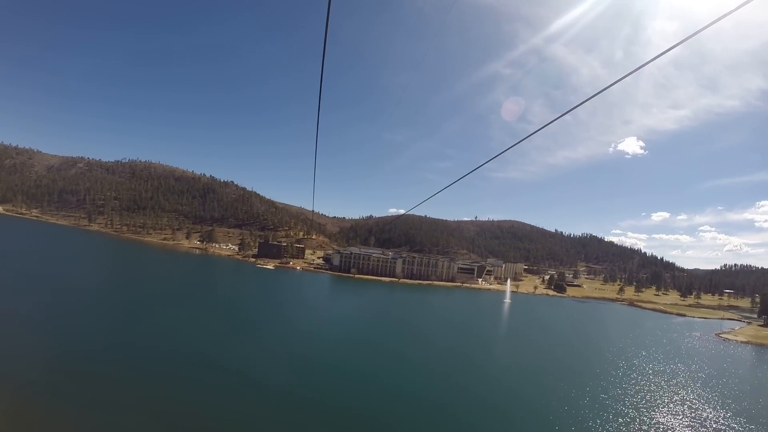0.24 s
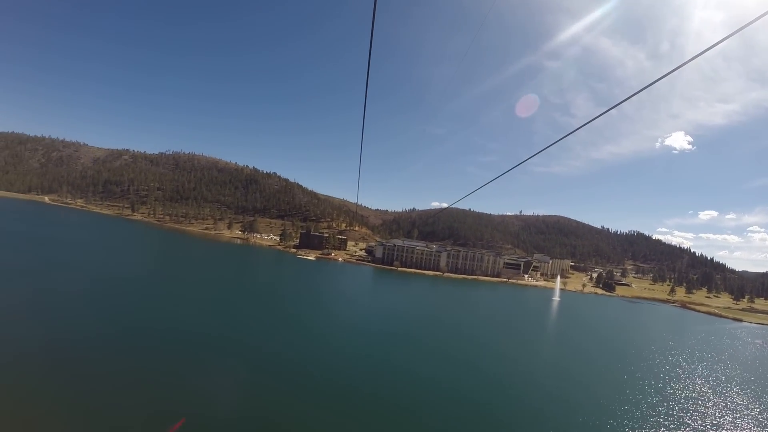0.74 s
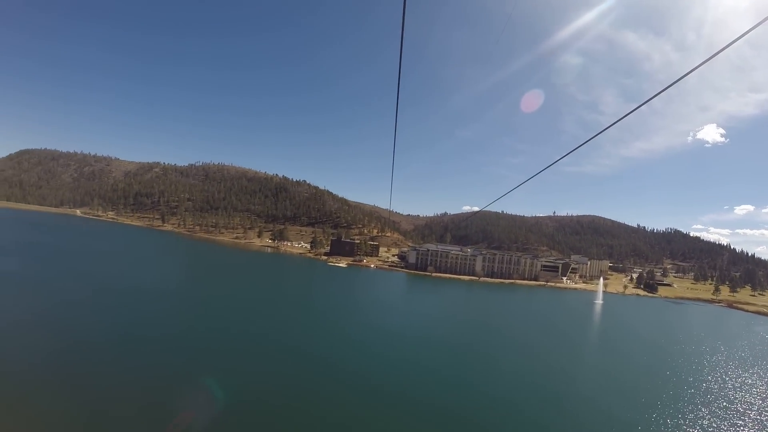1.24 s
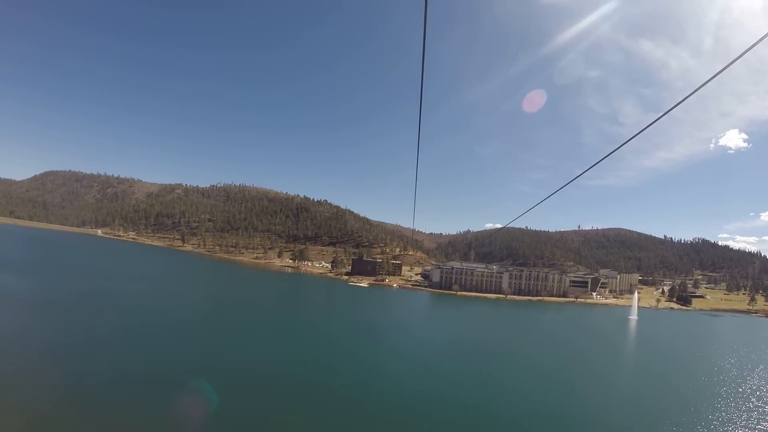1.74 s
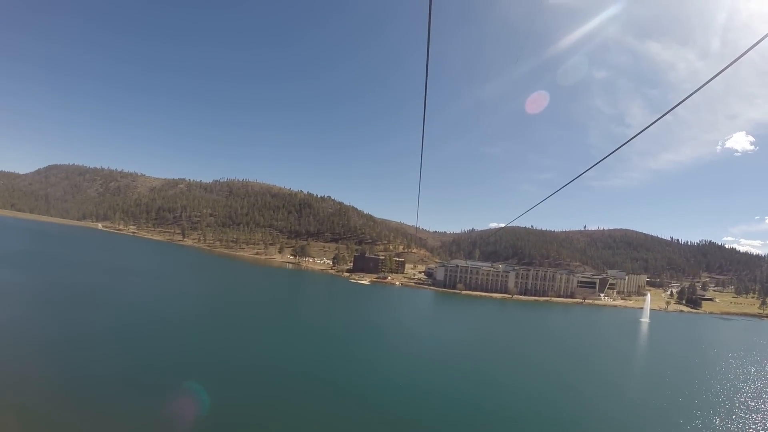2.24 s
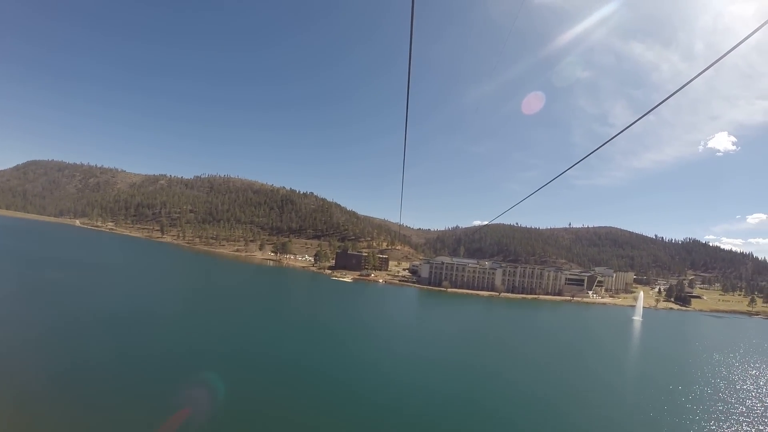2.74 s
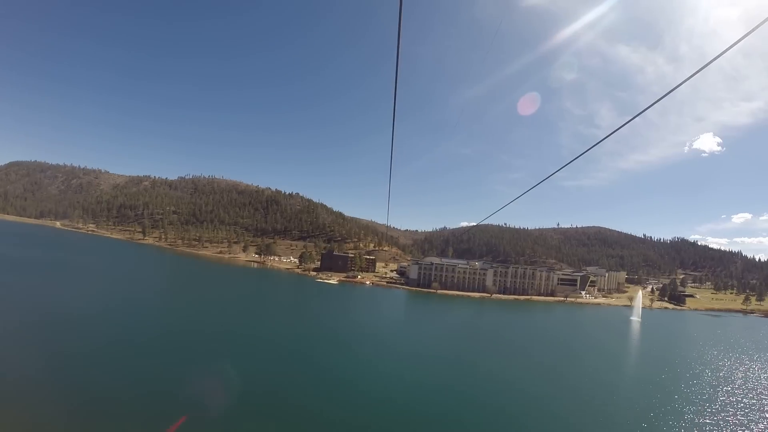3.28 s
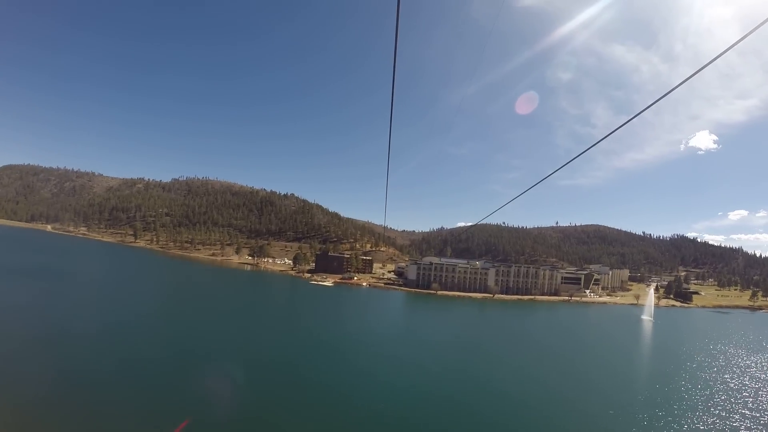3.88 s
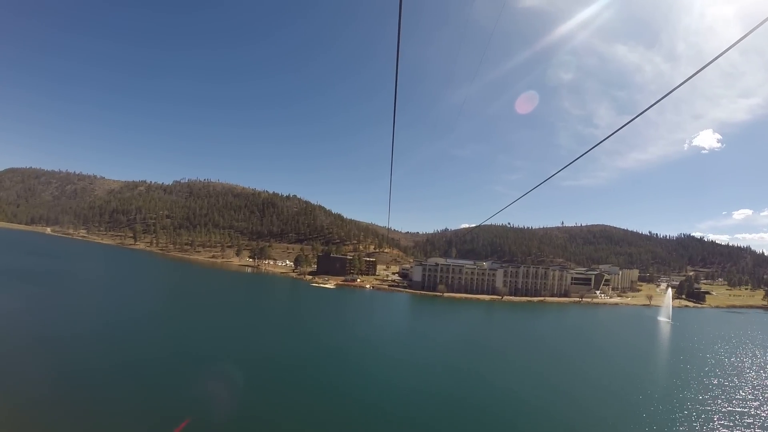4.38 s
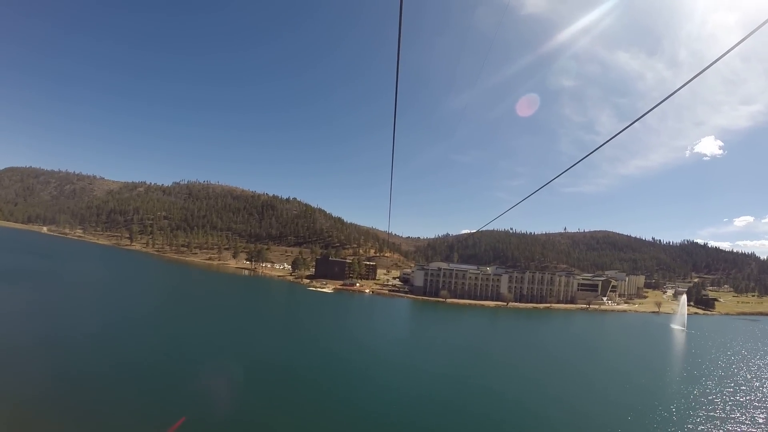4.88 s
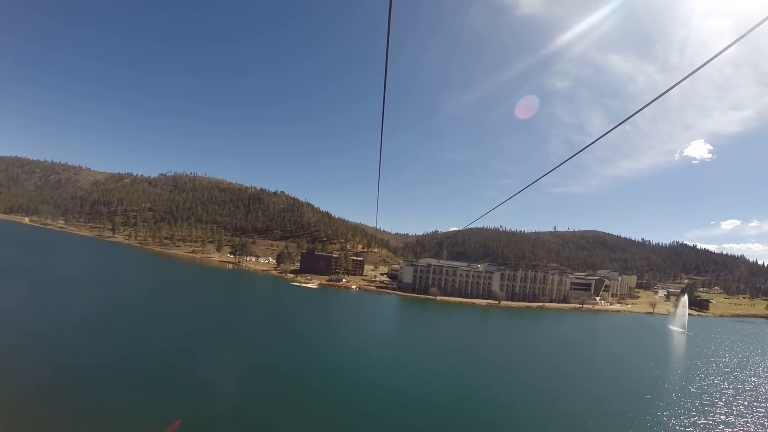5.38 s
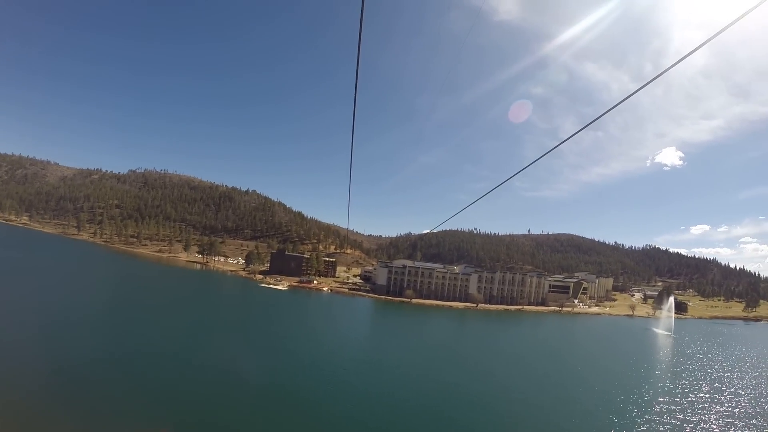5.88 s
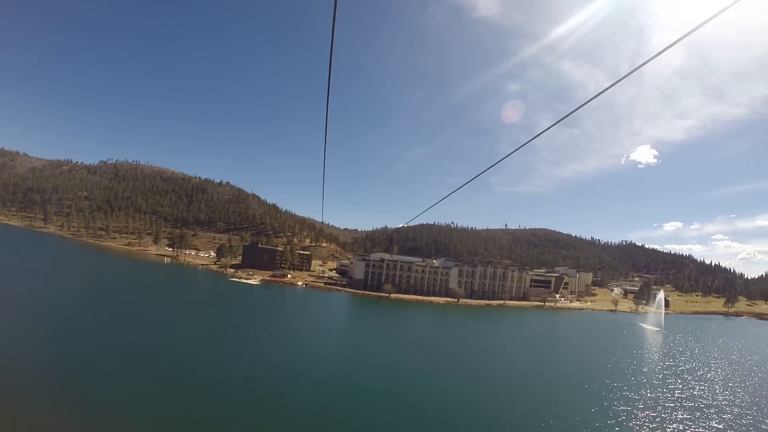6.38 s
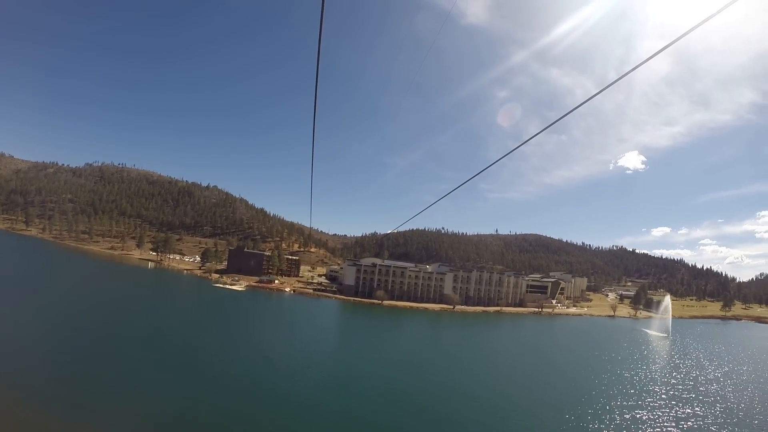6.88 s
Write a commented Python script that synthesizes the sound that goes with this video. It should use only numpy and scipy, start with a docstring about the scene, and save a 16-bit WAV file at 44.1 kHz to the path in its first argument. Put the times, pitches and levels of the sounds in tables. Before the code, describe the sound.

From 0 seconds the ride is in full motion: two trolley wheels roll fast on a steel cable, heard close through a resonant closed housing. A rough, bright steel roar dominates, strongest around the upper mids, with muffled wind rumbling and fluttering below. Two high whines near 2200 hertz, slightly apart, beat and waver through it, with a gritty, fast buzz from the front wheel. A tiny jolt ticks at about 0.8, and the roar surges around 1. It eases near 2.8 and 3.5, flickering constantly. Very short upward chirps of the front whine come near 1.1, 1.6, 3.5, 4.9, 5.6 and 6.4 as the wheel slips. From about 5.8 the roar thickens, and the front whine peaks at 6.2. The buzz fades near 6.9 while both whines sag slightly in pitch; the sound ends still rolling at 7.1.

```python
"""Fast trolley ride on a steel cable

A two-wheel trolley rolls fast along a steel cable, heard by a camera in a closed housing on the rider.
Wind rumbles on the microphone and steel on steel roars through the resonant housing: both are shaped noise.
Each wheel whines 19 times a turn, the two slightly apart so that they beat: both whines are sine waves.
More sine waves at multiples of the turn rate make the front wheel buzz once a turn."""
import sys
import numpy as np
from scipy import signal
from scipy.fft import rfft, irfft, next_fast_len
from scipy.io import wavfile
from scipy.ndimage import uniform_filter1d

SR = 44100
rng = np.random.default_rng(int(sys.argv[2]) if len(sys.argv) > 2 else 0)


def master(y):
    """Save y as 16-bit WAV."""
    cut = np.clip(np.atleast_2d(y).T, -1, 1)
    pcm = np.round(cut * 32767)  # scale
    wavfile.write(sys.argv[1], SR, pcm.astype(np.int16))


N = 313989  # length in samples

BUMPS_PER_TURN = 19
# Loudness of the two whines, before their flutter.
# Each row: time in seconds, front whine in dB, rear whine in dB.
WHINE_LEVELS = [(0, -41, -40), (.2, -35.5, -36.5), (.55, -42, -45), (.75, -39, -40), (.95, -43, -47),
                (1.15, -34.5, -39), (1.4, -44, -34.5), (1.6, -35, -38), (1.85, -39, -36.5),
                (2.2, -35.5, -39), (2.8, -40.5, -41), (3.35, -34, -45), (3.6, -36.5, -46),
                (4.2, -34, -40.5), (4.8, -36.5, -34.5), (5.1, -36.5, -35.5), (5.55, -34.5, -39),
                (5.8, -35, -43), (6.02, -34.5, -44), (6.17, -29, -57), (6.35, -31, -48), (6.6, -33.5, -46),
                (6.85, -34, -42), (7.12, -37, -44)]
WHINE_FLUTTER_DB = 2


def undb(db):
    """Gain of a level in dB."""
    return 10 ** (np.asarray(db) / 20)


def curves(table):
    """Columns of a table, after the time column, as one value per sample."""
    times, *columns = np.transpose(table)
    now = np.arange(N) / SR
    return [np.interp(now, times, column) for column in columns]


def walk(rate):
    """Smoothly wandering random curve, spread near 1, with about rate new values a second."""
    hold = int(SR / rate)
    steps = np.repeat(rng.standard_normal(N // hold + 1), hold)
    smooth = uniform_filter1d(uniform_filter1d(steps, hold), hold)
    return 1.69 * smooth[:N]  # smoothing shrinks the spread; this restores it


def colour(throb, points, rings, band_hz):
    """Spectrum and frequency axis of throbbing noise in the given colour, with unit level inside band_hz."""
    size = next_fast_len(N + SR // 10)
    hz = np.arange(1, size // 2 + 2) * SR / size
    point_hz, point_db = np.array(points).T
    db = np.interp(np.log(hz), np.log(point_hz), point_db)
    for ring_hz, width_hz, ring_db in rings:
        db = db + ring_db / (1 + (2 * (hz - ring_hz) / width_hz) ** 2)
    noise = np.resize(throb, size) * rng.standard_normal(size)
    spec = rfft(noise) * undb(db)
    inside = (hz > band_hz[0]) & (hz < band_hz[1])
    return spec * size / np.sqrt(2 * np.sum(np.abs(spec[inside]) ** 2)), hz


def bands(spec, hz, centres, db_of):
    """Sum of overlapping noise bands, each following its own level curve db_of(centre)."""
    place = np.interp(np.log(hz), np.log(centres), np.arange(len(centres)))
    out = np.zeros(N)
    for k, centre in enumerate(centres):
        share = np.clip(1 - np.abs(place - k), 0, 1)  # neighbouring bands crossfade
        out += irfft(spec * share)[:N] * undb(db_of(centre))
    return out


def jolt_db():
    """One short jolt: a brief lift in dB for the noise below and above the main roar."""
    jolt_s, half_s, lift_db = .795, .014, 5
    return lift_db * np.exp(-((np.arange(N) / SR - jolt_s) / half_s) ** 2)


def wind():
    """Turbulence on the microphone port: a rumble with a weaker rush above."""
    # How the wind rises and falls, before each band's flicker and the jolt.
    # Each row: time in seconds, rumble in dB, low rush in dB, high rush in dB.
    # Both rushes count from the rumble's mean level.
    wind_levels = [(0, -37, 2.5, -1), (.4, -39.5, -2.5, -1.5), (.75, -36.5, .5, 1), (.95, -34, 0, 4),
                   (1.4, -36.5, 1.5, 3.5), (2, -34, 0, 1), (2.8, -35, 0, -3), (3.3, -40, -3, -3),
                   (4, -35.5, -2.5, -2.5), (4.4, -36.5, 0.5, -2), (4.9, -37, -5, -2), (5.5, -35.5, -2, -3),
                   (5.9, -36.5, 1.5, 0.5), (7.12, -36, 1, 0.5)]
    # Colour of the wind. Each row: frequency in Hz, relative level in dB.
    wind_colour = [(12, -52), (20, -28), (45, -7.5), (114, 0.5), (288, -4.5), (460, -12.5), (750, -12.5),
                   (1100, -20), (2400, -58)]
    rumble_db, low_db, high_db = curves(wind_levels)
    spec, hz = colour(1., wind_colour, [], band_hz=(40, 330))

    def db_of(centre):
        if centre < 150:
            level_db = rumble_db
        elif centre < 350:
            level_db = low_db + rumble_db.mean()
        else:
            level_db = high_db + rumble_db.mean() + jolt_db()
        return level_db + 1.34 * walk(3.95)
    return bands(spec, hz, 40 * 1.6 ** np.arange(8), db_of)


def roar(turns):
    """Rough steel contact, a little louder once a turn; each band drifts and flickers on its own."""
    # How the roar rises and falls, before the trim and the random drifts below.
    # Each row: time in seconds, level in dB, then low part, treble and top in dB against that level.
    roar_levels = [(0, -26.5, 0.5, -1.5, -2.5), (.5, -28.2, 1.5, 0, 3), (.8, -27.5, 2, -1.5, 2),
                   (1, -24, 1.5, -3, -2), (1.25, -26, 1, -2.5, -1), (1.6, -26, 0, -2.2, -2.5),
                   (1.85, -27.5, 0, 0, 2), (2.4, -29, 1.5, -.5, 0), (2.8, -30.5, -.3, 1.5, 0),
                   (3.15, -28, -1, -.5, 0), (3.45, -31, -2, 1, 2.5), (4.1, -27.5, -2, -0.5, -.4),
                   (4.6, -30, -2, 1, 1.5), (5.05, -27, -2.5, -.5, 0), (5.4, -28.5, 0.5, -1, -.3),
                   (5.8, -25.5, -1, -2, -2), (6.2, -24, -0.5, -2, -1.5), (7.12, -24.5, -1.5, -0.6, -0.5)]
    # Colour of the roar inside the housing. Each row: frequency in Hz, relative level in dB per Hz.
    housing_colour = [(700, -26.5), (1000, -15.5), (1450, -4.5), (1850, -10), (2500, -6), (3300, 1),
                      (3600, -5), (3900, -18), (6000, -18.5), (7400, -30.5), (8000, -41.5), (10000, -38),
                      (12300, -49.5), (15000, -52)]
    # Narrow resonances and dips on top of it. Each row: centre in Hz, width in Hz, height in dB.
    housing_rings = [(2205, 190, 1.5), (2640, 200, 1.5), (3080, 130, -4.5), (3438, 94, -5), (3765, 120, -3),
                     (4670, 84, -3.5), (6230, 490, -3.5), (6860, 320, 2.5), (8770, 570, 8.5),
                     (9500, 500, 1.5), (10000, 300, -4), (11400, 600, -2), (12500, 400, 0),
                     (13200, 500, -13)]
    # Two narrow bands that sink and return.
    # Each row: time in seconds, lower band in dB, upper band in dB.
    narrow_levels = [(0, -2, 3), (1, -1, 2), (1.8, 1.5, -4), (3, 2.5, -8), (4.6, 1.5, -5), (5.2, -2, 4.5),
                     (6, -2.5, 1), (7.12, -2, 3)]
    narrow_hz, narrow_width_hz = (4100, 5170), (950, 200)
    trim_db = -1.5

    main_db, low_db, treble_db, top_db = curves(roar_levels)
    narrow = curves(narrow_levels)
    throb = 1 + .07 * np.cos(2 * np.pi * turns)
    spec, hz = colour(throb, housing_colour, housing_rings, band_hz=(2400, 3800))
    # upper edge of each part in Hz, and its level against the main one
    parts = [(1950, low_db + jolt_db()), (3900, 0), (7800, treble_db), (SR, top_db + jolt_db())]
    shudder_db = .7 * walk(6)  # shared by all bands

    def db_of(centre):
        part_db = next(db for edge_hz, db in parts if centre < edge_hz)
        narrow_db = sum(db * np.exp(-(2 * (centre - at) / width) ** 2)
                        for db, at, width in zip(narrow, narrow_hz, narrow_width_hz))
        drift_db = .7 * walk(2.5)
        flicker_db = 1.08 * walk(14)
        return main_db + trim_db + part_db + shudder_db + narrow_db + drift_db + flicker_db
    return bands(spec, hz, 1000 * 1.055 ** np.arange(51), db_of)


def whine(turns, db):
    """Steady bumps of a turning wheel heard as one tone, its phase wandering a little."""
    phase = 2 * np.pi * BUMPS_PER_TURN * turns + .45 * walk(11)
    return np.sqrt(2) * undb(db) * np.sin(phase)


def partial(turns, order, db):
    """One multiple of the turn rate; its phase and level wander as wheel and cable flex."""
    phase = 2 * np.pi * (order * turns + rng.random()) + .35 * walk(9)
    return np.sqrt(2) * undb(db + 1.8 * walk(6)) * np.sin(phase)


def rear_wheel():
    """Rear whine, with weaker partials that rise and fall with it."""
    # Pitch of the rear whine. Each row: time in seconds, whine in Hz.
    rear_pitch = [(0, 2213), (.7, 2214), (1.4, 2206), (2.15, 2186), (2.6, 2183), (3.4, 2169), (3.8, 2173),
                  (3.95, 2168), (4.3, 2176), (4.5, 2172), (5.1, 2170), (5.75, 2170), (6.3, 2159),
                  (7.12, 2117)]
    # Other partials. Each row: multiple of the turn rate, level in dB against the whine.
    rear_partials = [(18, -15), (20, -12), (37, -21), (38, -23)]
    turns = np.cumsum(curves(rear_pitch)[0]) / SR / BUMPS_PER_TURN
    whine_db = curves(WHINE_LEVELS)[1] + WHINE_FLUTTER_DB * walk(7)
    out = whine(turns, whine_db)
    for order, db in rear_partials:
        out += partial(turns, order, db + whine_db)
    return out


def slipping():
    """Extra turns per second as the front wheel slips: quick run-ups that settle again."""
    # Moments of slip. Each row: start in seconds, size of the run-up in turns per second.
    slip_moments = [(1.11, .9), (1.55, 1.8), (3.52, 2.0), (4.895, 3.1), (5.625, 2.8), (6.365, .9)]
    rise_s, settle_s = .012, .06
    start, extra = (column[:, None] for column in np.transpose(slip_moments))
    since = np.maximum(np.arange(N) / SR - start, 0)
    rise = np.minimum(since / rise_s, 1)
    settle = np.exp(-np.maximum(since - rise_s, 0) / settle_s)
    return (extra * rise * settle).sum(axis=0)


def whistle_db(partial_hz):
    """A narrow ring lifts a partial as it passes and leaves it weaker away from the ring."""
    ring_hz, width_hz, peak_db, skirt_db = 4490, 130, 3, -8
    near = 1 / (1 + (2 * (partial_hz - ring_hz) / width_hz) ** 2)
    return skirt_db + (peak_db - skirt_db) * near


def front_wheel():
    """Front whine and the once-a-turn buzz, built from multiples of the turn rate; also the turns so far."""
    # Front wheel slowing with the ride, before slips. Each row: time in seconds, turns per second.
    front_speed = [(0, 118.13), (.6, 117.5), (.9, 116.98), (1.5, 116.5), (2, 116.25), (2.2, 116.25),
                   (2.5, 115.6), (2.9, 115.65), (3.5, 115.25), (3.7, 115.95), (4.9, 115.2), (5.1, 115.3),
                   (5.6, 114.5), (5.85, 114.55), (6.1, 113.62), (6.37, 113.68), (6.7, 112.25),
                   (6.9, 111.75), (7.12, 111.63)]
    # Partials of the buzz. Each row: multiple of the turn rate, level in dB before swells and the whistle.
    front_partials = [(1, -50.5), (10, -61), (11, -55), (12, -53), (13, -52), (14, -54), (15, -59),
                      (16, -53), (17, -56), (18, -47), (20, -45), (21, -50), (22, -48), (23, -50),
                      (24, -47), (25, -46), (26, -47), (27, -43), (28, -41), (29, -42), (30, -50),
                      (31, -53), (32, -55), (33, -59), (35, -65), (38, -56), (39, -58), (42, -67),
                      (43, -68)]
    # Swells of the buzz.
    # Each row: time in seconds, change of all partials in dB, extra change of multiples 27 to 29 in dB.
    buzz_swells = [(0, -1, -5), (.6, 2, 2.5), (1.4, 0, -13), (2.3, 0, -3), (2.9, 0, -3.5), (3.3, 0.5, 0.5),
                   (3.7, 1, -2.5), (4.3, 2.5, -1.5), (4.8, 2, 0.5), (5.1, -2.5, -1), (5.7, 0, 2),
                   (6, 1.5, 4.5), (6.6, 1, 3.5), (6.9, -6, 2), (7.12, -5, 1)]
    rate = curves(front_speed)[0] + slipping()
    turns = np.cumsum(rate) / SR
    out = whine(turns, curves(WHINE_LEVELS)[0] + WHINE_FLUTTER_DB * walk(7))
    all_db, strong_db = curves(buzz_swells)
    for order, db in front_partials:
        level_db = db + all_db
        if order in (38, 39):
            level_db = level_db + whistle_db(order * rate)
        if 27 <= order <= 29:
            level_db = level_db + strong_db
        out += partial(turns, order, level_db)
    return out, turns


def scene():
    """Wind, roar and both wheels, all on one microphone."""
    front, turns = front_wheel()
    return (wind() + roar(turns) + rear_wheel() + front)[None]


def record(dry):
    """The camera cuts the top: a steep low-pass at 15050 Hz."""
    top_cut = signal.ellip(12, .5, 60, 15050, fs=SR, output="sos")
    return signal.sosfilt(top_cut, dry)


dry = scene()
out = record(dry)
master(out)
```